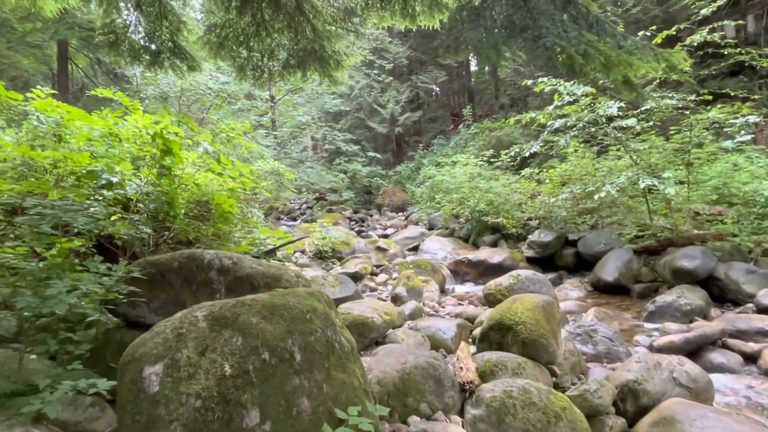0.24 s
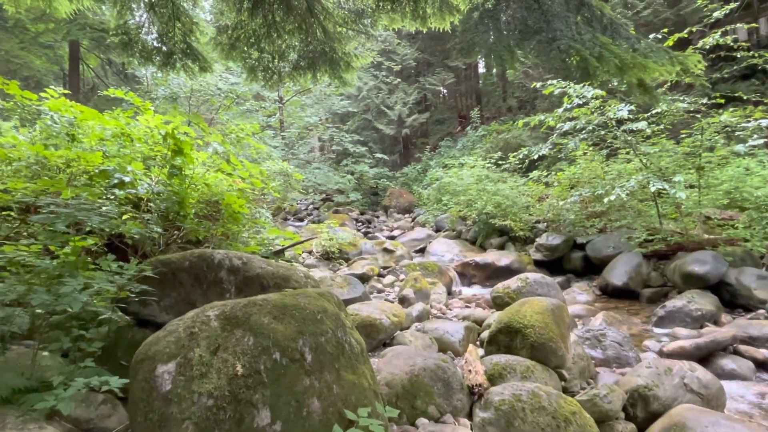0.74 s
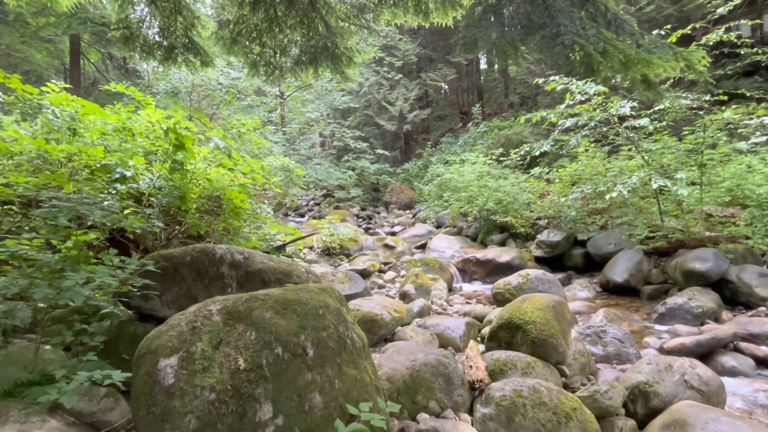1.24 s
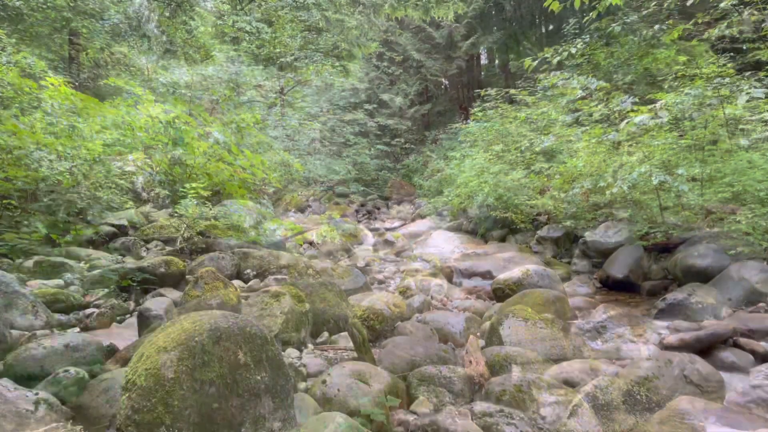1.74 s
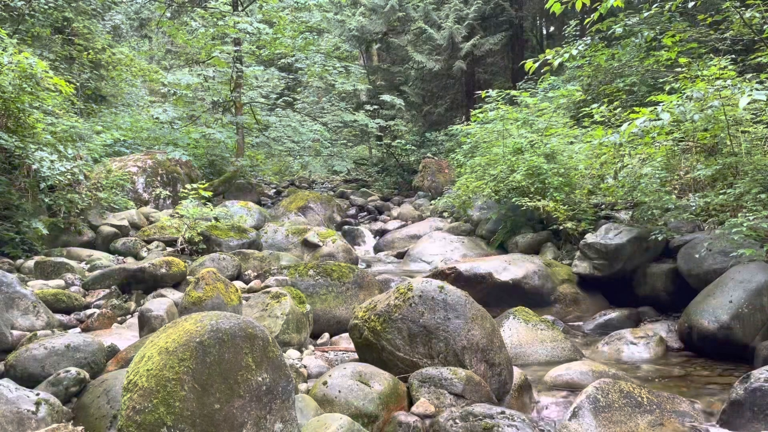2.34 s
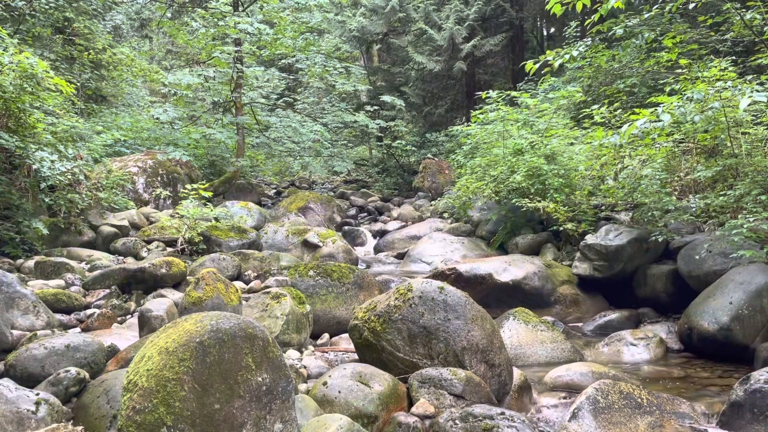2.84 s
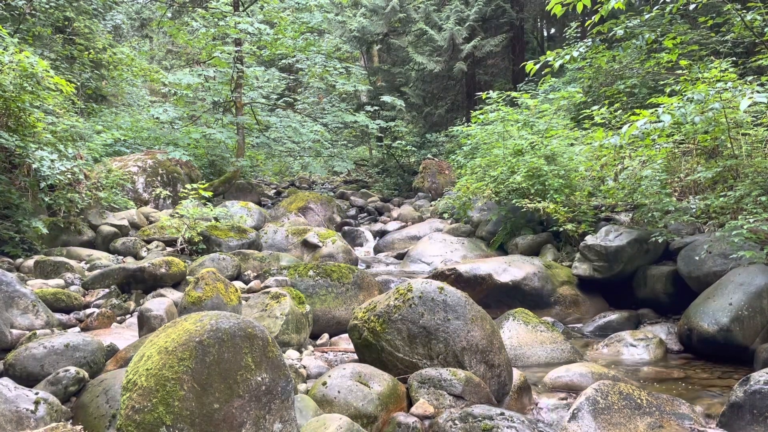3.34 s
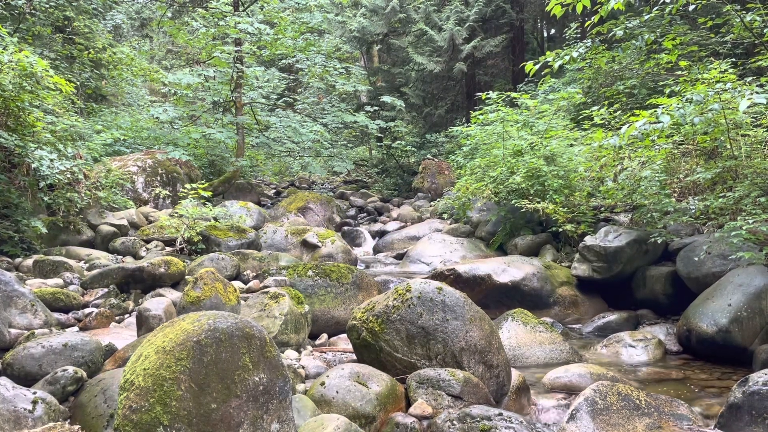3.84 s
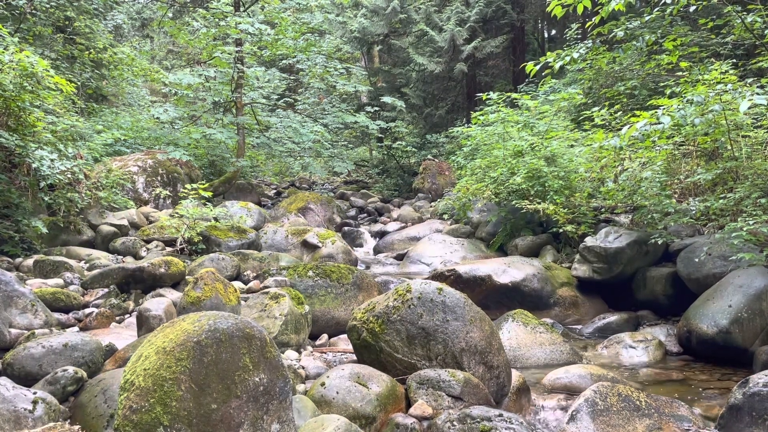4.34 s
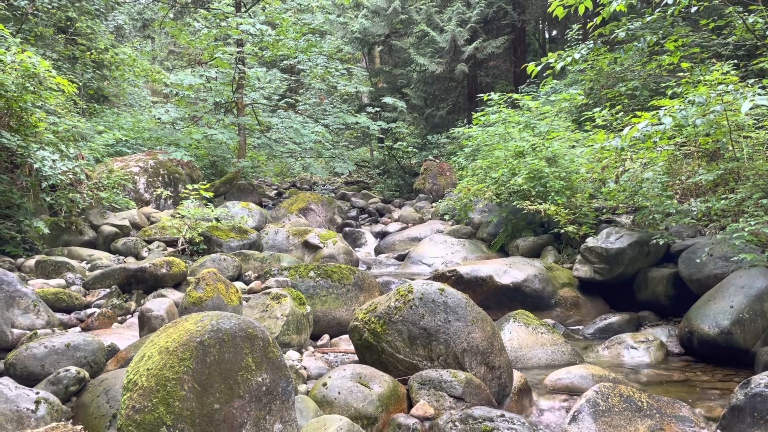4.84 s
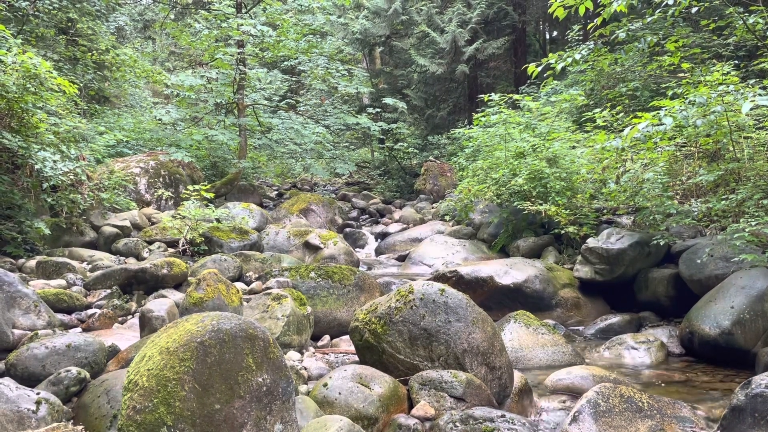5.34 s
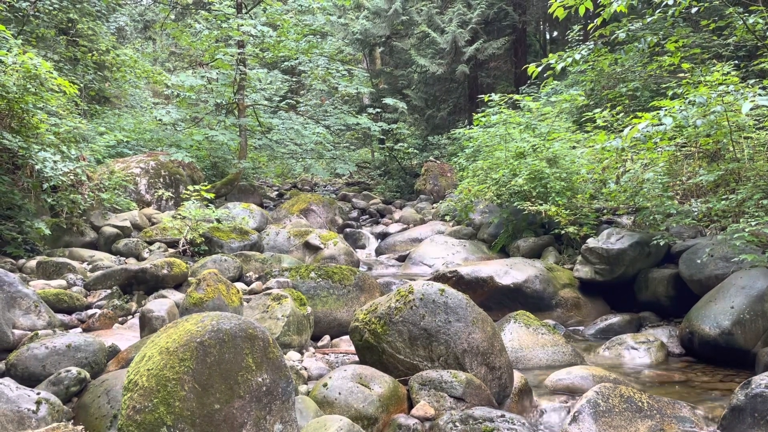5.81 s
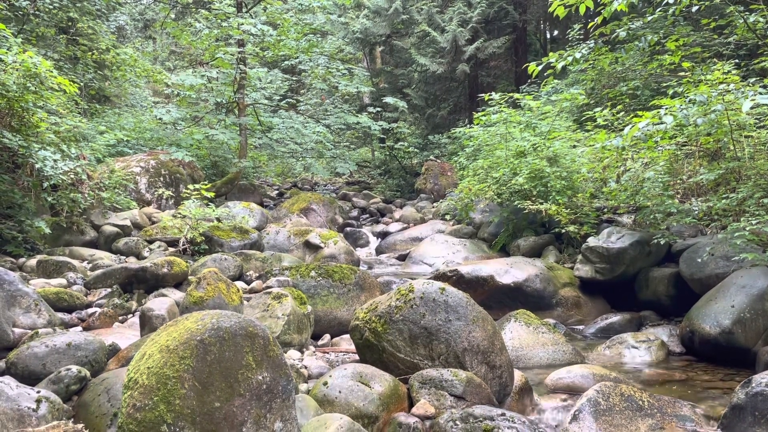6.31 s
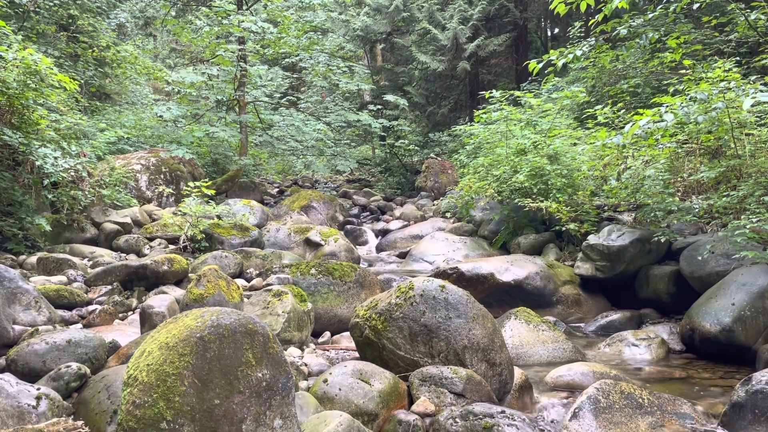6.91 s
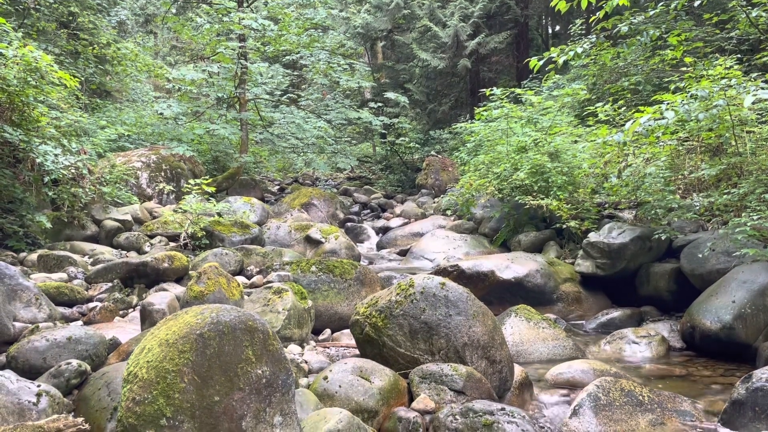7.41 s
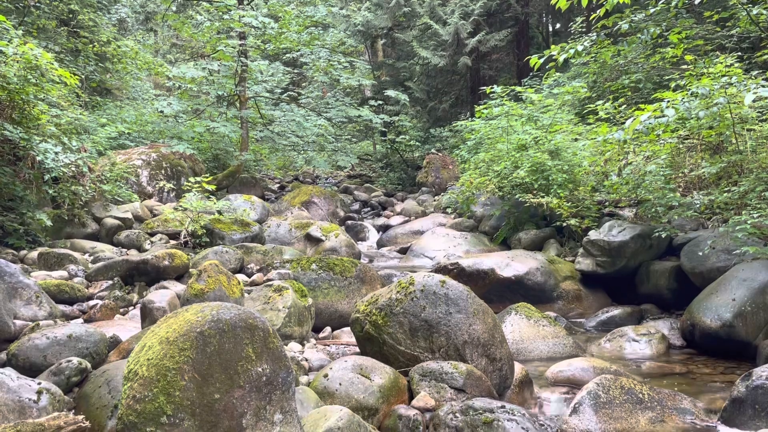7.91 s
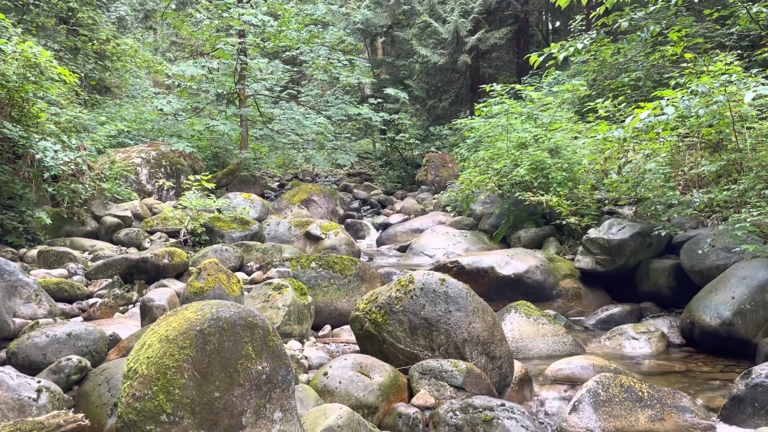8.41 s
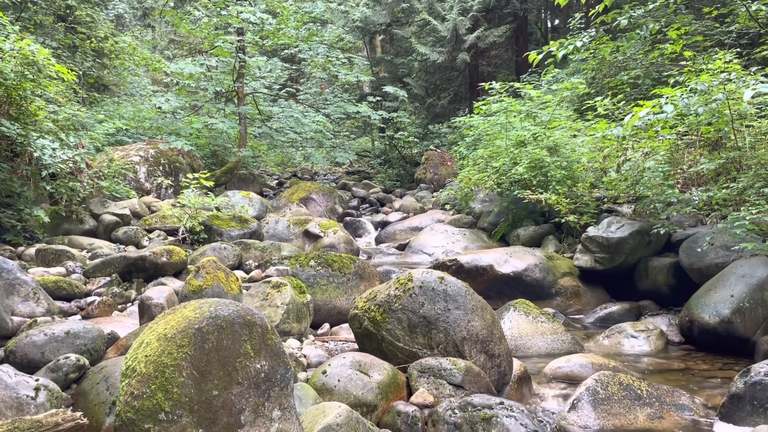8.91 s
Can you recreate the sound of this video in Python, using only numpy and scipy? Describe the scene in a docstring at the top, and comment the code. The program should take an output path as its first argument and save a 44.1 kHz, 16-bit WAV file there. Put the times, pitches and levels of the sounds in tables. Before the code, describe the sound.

A quiet creek with a faint low hum crossfades to a louder, closer small cascade, rushing steadily with gurgles, plops and little splashes.

```python
"""Forest creek between boulders

A shallow creek is heard on a phone's two microphone ports: first from a quieter spot, then, after an
equal-power cross-fade, from beside a small cascade. Noise mixed with swarms of damped sines makes the rush
of bubbles and spray; a hollow between stones hums as a wavering tone with its octave at the first spot.
Splashes are short puffs of filtered noise; larger trapped bubbles gurgle as single damped sines."""
import sys
import numpy as np
from scipy import signal
from scipy.fft import rfft, irfft, next_fast_len
from scipy.io import wavfile
from scipy.ndimage import uniform_filter1d, map_coordinates

SR = 44100
rng = np.random.default_rng(int(sys.argv[2]) if len(sys.argv) > 2 else 0)


def materialize(psi):
    """Save the field psi as 16-bit PCM at rate SR to the path in sys.argv[1].

    A 1-D psi becomes a single channel; in a 2-D psi each row is a channel.
    """
    bounded = np.clip(np.atleast_2d(psi).T, -1, 1)
    quanta = np.round(bounded * 32767).astype(np.int16)
    wavfile.write(sys.argv[1], SR, quanta)


N = 403956


def amp(db):
    """Decibel law: a level in dB becomes an amplitude ratio."""
    return 10 ** (np.asarray(db) / 20)


def unit(x):
    """Root-mean-square normalisation: the mean of the channels gets rms 1."""
    mid = np.atleast_2d(x).mean(0)
    return x / np.sqrt(np.mean(mid ** 2) + 1e-20)


def curves(rows):
    """Linear interpolation: one value per sample for each column after the time."""
    time_s, *columns = np.transpose(rows)
    return [np.interp(np.arange(N) / SR, time_s, column) for column in columns]


def wobble(rate):
    """Band-limited random fluctuation: a smooth curve of rms 1 through `rate` random knots a second."""
    knots = rng.standard_normal(int(N * rate / SR) + 4)
    return unit(map_coordinates(knots, [np.arange(N) * rate / SR]))


def filtered(x, response):
    """Linear filtering: the spectrum of x times a complex response of frequency."""
    size = next_fast_len(N + SR // 4)
    hz = np.fft.rfftfreq(size, 1 / SR)
    return irfft(rfft(x, size) * response(hz), size)[..., :N]


def above(hz, edge_hz):
    """High-pass power response: the share of power passed, one half at the edge."""
    return hz ** 4 / (hz ** 4 + edge_hz ** 4)


def ports(lead, hz):
    """Stereo phase and level difference: left and right responses, half of each on each side."""
    lead_hz, lead_rad, balance_db = np.transpose(lead)
    gain = amp(np.interp(hz, lead_hz, balance_db) / 2)
    left = gain * np.exp(.5j * np.interp(hz, lead_hz, lead_rad))
    return np.array([left, 1 / left])


PITCH_RISE = .015  # half the share of its pitch that a bubble gains per envelope time, nearing the surface


def bubbles(start, hz, gain, cycles, size):
    """Bubble resonance: damped sines that start softly, peak after `cycles` and rise a little in pitch."""
    turns = hz[:, None] * np.arange(size) / SR
    u = turns / cycles
    envelope = gain[:, None] * np.e * u * np.exp(-u)
    wave = envelope * np.sin(2 * np.pi * turns * (1 + PITCH_RISE * (u - 2)))  # passes hz at its peak
    at = np.round(start * SR).astype(int)[:, None] + np.arange(size)
    return np.bincount(at.ravel(), wave.ravel(), N + size)[:N]


def swarm(count, low_hz, high_hz, cycles, spread_db, size):
    """Superposition of many bubble resonances, some louder than the rest, into a flat spectrum of rms 1."""
    when, pitch, chance = rng.random((3, count))
    hz = low_hz * (high_hz / low_hz) ** pitch
    loud = np.minimum(-np.log(1 - chance), 3.5)
    return unit(bubbles(when * N / SR, hz, hz * amp(spread_db * loud), cycles, size=size))


def white_water():
    """Random superposition: patchy hiss with bubbles, heard directly, and patchy hiss scattered by the banks."""
    z = signal.stft(rng.standard_normal((2, N)), nperseg=256)[2]
    # one field of random patches in time and frequency shapes both streams
    patches = rng.standard_normal(z.shape[1:])
    patches = uniform_filter1d(uniform_filter1d(patches, 8, 0), 8, 1)
    patch_gain = amp(1.42 * patches / patches.std())
    direct, scattered = signal.istft(z * patch_gain, nperseg=256)[1][:, :N]
    direct += amp(-22) * swarm(count=500, low_hz=121.0, high_hz=573, cycles=1.6, spread_db=1.0, size=3000)
    direct += amp(-14.5) * swarm(count=3000, low_hz=546.7, high_hz=2518, cycles=3.52, spread_db=1.0, size=1500)
    direct += amp(-11.5) * swarm(count=4000, low_hz=2482, high_hz=12860, cycles=8.2, spread_db=2.5, size=700)
    return direct, scattered


# edges between rumble, burble, rush and spray: edge_hz
SPLITS_HZ = [240, 600, 2500]
# chance drift of each band, before the spot's share of it: rumble_db, burble_db, rush_db, spray_db
WANDER_DB = (0.51, 0.48, 0.23, 1)


def rush(spot, lead, levels_db, calm=1, rumble_db=0, burble_db=0, body_db=0):
    """Partly coherent sound field: direct and scattered water in four bands; calm is the share of drift left."""
    spot_hz, level_db, alike = np.transpose(spot)
    size = next_fast_len(N)
    hz = np.fft.rfftfreq(size, 1 / SR)
    direct, scattered = [rfft(stream, size) for stream in white_water()]
    colour_db = np.interp(np.log(hz + 1), np.log(spot_hz), level_db)
    colour = amp(colour_db) * above(hz, 26) * ports(lead, hz)
    # scattered water enters the two sides with opposite sign and so lowers their likeness
    turn = np.arccos(np.clip(np.interp(hz, spot_hz, alike), 0, 1)) / 2
    pair = colour * (np.cos(turn) * direct + np.sin(turn) * scattered * [[1], [-1]])

    shares = -np.diff([hz ** 0, *[above(hz, edge) for edge in SPLITS_HZ], 0 * hz], axis=0)
    bands = []
    for share, db, drift_db in zip(shares, levels_db, WANDER_DB):
        band = unit(irfft(pair * np.sqrt(share), size)[:, :N])
        bands.append(amp(db + calm * drift_db * wobble(4.5)) * band)
    rumble, burble, body, spray = bands

    # the spray thickens and thins in all its bands at once; the rush follows weakly
    surge_db = calm * (0.5 * wobble(9) + 1.11 * wobble(45))
    low = amp(rumble_db) * rumble + amp(burble_db) * burble
    return low + amp(body_db + 0.33 * surge_db) * body + amp(surge_db) * spray


# the quieter spot's tone colour and left-right likeness: pitch_hz, level_db, left_right_likeness (0-1)
QUIET_SPOT = [(35, -11, .92), (66, -4, 0.9), (77, -2, .92), (88, 6, .93), (104, -5, .97), (152, 0, .98),
              (205, 1, .96), (265, -4.5, .95), (328, -1, 1), (460, -8.5, 0.6), (780, -7, 0.83),
              (1380, -14.5, 0.1), (2300, -21.5, 0.15), (3640, -23.5, .5), (5300, -24, 0.3), (9900, -29, 0),
              (12100, -35, .99), (15700, -41, 1)]
# stereo image of the quieter spot: pitch_hz, left_lead_rad, left_minus_right_db
QUIET_LEAD = [(0, 0, -1.5), (520, -1.5, -1), (800, -1.6, -4.5), (1400, -1.8, 0), (2300, -3.2, 0),
              (3700, -6.7, 2.2), (5300, -9.5, 1.5), (7000, -12.3, 1), (9300, -16, -6.5), (11200, -18.8, 0),
              (12800, -18.9, 0), (14000, -21.99, 0)]
# steady levels there: rumble_db, burble_db, rush_db, spray_db
QUIET_DB = (-43.5, -48.5, -43.5, -47.5)


def quiet_stream():
    """Averaging over distance: the stream at the first, more distant spot drifts less in level."""
    return rush(QUIET_SPOT, QUIET_LEAD, QUIET_DB, calm=.4)


# the cascade's tone colour and left-right likeness: pitch_hz, level_db, left_right_likeness (0-1)
CASCADE = [(34, -15, .97), (88, 3, .99), (144, 1.5, 0.92), (367, 2.5, 0.93), (467, -3, 0.63),
           (975, -6, 0.89), (1650, -7.5, 0.66), (2630, -17, 0.09), (3480, -16.5, 0.62), (5030, -19.5, 0.53),
           (6260, -21, 0.65), (7600, -18.0, 1.0), (9200, -21.5, 1.0), (11460, -26.0, .9), (13800, -27.5, 1),
           (15500, -30, 1)]
# stereo image of the cascade: pitch_hz, left_lead_rad, left_minus_right_db
CASCADE_LEAD = [(0, 0, -.3), (400, -.4, -1.4), (1100, -.7, -2.6), (1900, -1.4, 1), (2700, -1.1, 4.5),
                (3300, .3, 3), (4800, .75, 3.7), (6900, -1.1, 1.5), (7700, -2.95, 0), (8900, -3.35, 0),
                (10400, -6.1, 0), (12300, -6.4, 0), (13900, -9.35, 0), (14500, -9.42, 0)]
# steady levels there: rumble_db, burble_db, rush_db, spray_db
CASCADE_DB = (-38.5, -43, -35.5, -39.5)
# the cascade's rumble against its steady level: time_s, rumble_db
RUMBLE = [(1.9, -5.5), (2.5, 0.5), (3.2, 3.5), (4.1, -1), (4.7, -1.5), (5.4, 2), (6.1, 2.3), (7.0, -1),
          (7.8, 2), (8.6, 1), (9.16, 1)]
# the cascade swells and sinks against its steady levels: time_s, burble_db, rush_db
SWELL = [(1.9, -1, -1.5), (2.4, 4, -0.8), (2.75, -3, 1), (3.05, -6, 0.8), (3.6, -5, 0.5), (4.05, 1, 1),
         (4.35, 8.5, 1.2), (4.9, 3.5, 0.5), (5.3, 4, -1.5), (5.8, 3.5, 1.3), (6.15, -19, 1.5),
         (6.5, -1, 1.5), (6.8, 4.5, -2), (7.05, -6, 3), (7.28, 5, 2.5), (7.38, -2, 3), (7.6, -11, 1.8),
         (8.3, -4, 1), (8.65, -1, -1), (9.16, 0, 3.5)]


def cascade_stream():
    """Amplitude modulation by band: the stream beside the cascade swells and sinks along set curves."""
    return rush(CASCADE, CASCADE_LEAD, CASCADE_DB, 0.72, *curves(RUMBLE), *curves(SWELL))


# a hollow between stones sings as it fills and empties: time_s, pitch_hz, level_db
HUM = [(0.0, 173.3, -47), (0.2, 166.7, -46), (0.33, 159, -40), (0.4, 139.5, -45), (0.5, 159.8, -51),
       (0.8, 148, -50), (0.9, 157.5, -43.5), (1.1, 149, -43.5), (1.19, 166, -46), (1.27, 149.6, -43),
       (1.45, 151.7, -43), (1.55, 160, -52), (1.7, 156, -58)]
OVERTONE_DB = -10.5  # the octave against the note, before both flutter


def hum():
    """Cavity resonance: water passing a hollow sings one low note and a faint octave, fluttering in level."""
    hz, db = curves(HUM)
    phase = 2 * np.pi * np.cumsum(hz + 4 * wobble(12)) / SR  # pitch wavers by 4 Hz rms
    note = amp(1.5 * wobble(17.47)) * np.sin(phase)
    octave = amp(OVERTONE_DB + 4.3 * wobble(9.7)) * np.sin(2 * phase)
    return np.sqrt(2) * amp(db) * (note + octave)


# cross-fade between the spots: time_s, second_spot_share (0-1)
FADE = [(1.45, 0.03), (1.75, .3), (2.0, .7), (2.2, 1)]


def at_cascade(share):
    """Uniform placement: a share 0-1 becomes a moment while the cascade sounds alone."""
    fade_end_s = FADE[-1][0]
    return fade_end_s + (N / SR - fade_end_s) * share


# chance bursts at the cascade: peak, top band against it, scatter either way
SPIT_DB, SPIT_TOP_DB, SPIT_SPREAD_DB = -29.5, -12, 5
# the loudest bursts of spray: peak_s, level_db, top_band_against_whole_db
SPLASHES = [(0.974, -41, 10.5), (1.944, -36, -5.6), (2.134, -28, -5), (2.662, -26, -15.6), (2.724, -26, -9),
            (3.008, -24.5, -4), (3.331, -24, -10), (3.742, -22, -17), (3.976, -27, -10), (5.236, -34, 9),
            (5.449, -35, 6), (5.61, -26, -13), (5.786, -25.5, -4), (6.146, -31, 3), (6.314, -32, 5),
            (6.475, -25, -9), (6.645, -24, -7), (7.666, -23, -5), (7.724, -22.5, -5), (7.988, -24.5, -8),
            (9.134, -22, -10)]


def noise_band(low_hz, high_hz):
    """Band-pass filtering: white noise kept between two smooth edges, at rms 1."""
    noise = rng.standard_normal(N)
    return unit(filtered(noise, lambda hz: above(hz, low_hz) * (1 - above(hz, high_hz))))


def splashes(count=18):
    """Impulsive noise: each splash is a puff a few milliseconds long, some brighter than others."""
    t = np.arange(N) / SR
    whole, top = np.zeros(N), np.zeros(N)
    when, loud, bright = rng.random((count, 3)).T
    spit_db = SPIT_DB + SPIT_SPREAD_DB * (2 * loud - 1)
    spit_top_db = SPIT_TOP_DB + SPIT_SPREAD_DB * (2 * bright - 1)
    for s, db, top_db in [*SPLASHES, *zip(at_cascade(when), spit_db, spit_top_db)]:
        near = slice(max(round(s * SR) - 400, 0), round(s * SR) + 1200)
        u = t[near] - s
        puff = np.where(u < 0, np.exp(-(u / 0.0017) ** 2), np.exp(-u / 0.0035))
        whole[near] += amp(db) * puff
        top[near] += amp(db + top_db) * puff
    spray = whole * noise_band(2900, 7900) + top * noise_band(7800, 10000)
    return spray / 2  # peaks of the noise reach twice its rms


# cycles to the peak at 1 kHz; power of pitch by which small bubbles ring for more cycles
CYCLES_AT_1K, CYCLES_GROW = 1.5, 0.36
# chance bubbles at the cascade: peak at 300 Hz, scatter either way; loss per octave up, torn ones too
STRAY_DB, STRAY_SPREAD_DB, FALL_DB = -34, 6, 1
# smaller bubbles torn off a loud one: greatest delay, level against it, greatest rise in pitch
CLOUD_S, CLOUD_DB, CLOUD_OCTAVES = .02, -10, 0.72
# single low and high gurgles, and one short swell of the hum at 0.375 s:
# start_s, level_db, pitch_hz, cycles_to_peak
GURGLES = [(0.218, -23.5, 970, 1.4), (0.229, -30, 250, 0.98), (0.25, -35, 206, 4.5), (0.28, -27, 744, 2.6),
           (0.375, -35, 130, 1.8), (0.45, -27.5, 365, 1.3), (0.82, -29, 950, 2), (0.561, -21, 796, 1.8),
           (0.6, -25, 900, 1.8), (0.612, -30, 885, 4), (0.68, -35.5, 325, 4), (0.721, -27, 760, 1.3),
           (0.737, -31, 530.0, 1.9), (1.03, -29, 1586, 1.6), (1.5, -35, 160.5, 2), (1.615, -32, 298, 2.5),
           (1.949, -16, 965, 0.45), (1.951, -30, 1890, 2.3), (1.952, -28.5, 167.0, 1.4),
           (1.989, -35.0, 2830.0, 4.4), (2.067, -23.5, 316, 1.4), (2.07, -32, 119, 1.4),
           (2.155, -27, 1890.0, 2.5), (2.182, -23.0, 143, 0.59), (2.191, -25, 400.0, 1.4),
           (2.205, -24, 324, 2), (2.216, -25, 440.0, 1.1), (2.226, -20.0, 1500.0, 1.1),
           (2.262, -24, 1230, 1.5), (2.368, -24.0, 1135, 2.6), (2.372, -17, 295, 0.66),
           (2.374, -24, 155, 1.7), (2.388, -26, 670.0, 0.8), (2.452, -25, 1130, 3.3),
           (2.477, -21, 500.0, 0.52), (2.683, -19, 840, 0.83), (2.687, -23.5, 166, 0.86),
           (2.705, -23, 251, 1.1), (2.723, -13, 308, 0.43), (2.735, -26, 380, 1.1),
           (2.883, -25, 2380.0, 1.6), (2.945, -24, 520, 1.8), (3.153, -27, 145, 1.8),
           (3.269, -28.0, 930, 3.5), (3.322, -26.5, 168, 1.7), (3.329, -22, 640, 0.89),
           (3.333, -22, 396, 0.7), (3.359, -29, 530.0, 0.64), (3.454, -26.0, 4490.0, 2.2),
           (3.568, -25, 1080, 1.3), (3.607, -16, 1580, 0.79), (3.61, -23.5, 670.0, 1.3),
           (3.614, -27, 210.0, 0.84), (3.725, -25, 1780.0, 3.8), (3.736, -20.0, 1490, 1.6),
           (3.737, -19, 352, 0.7), (3.976, -25, 139, 2), (4.013, -24.0, 535, 1.1), (4.322, -19, 285, 1.1),
           (4.344, -24, 4230.0, 2.2), (4.363, -20.5, 1230, 2.2), (4.377, -24, 533, 1.1),
           (4.424, -21, 427, 1.5), (4.482, -25, 560.0, 1.1), (4.512, -21, 290, 1.2), (4.523, -25, 370, 1.2),
           (4.574, -26, 340, 1.1), (4.631, -22, 292, 1.3), (4.682, -23, 340, 0.78), (4.704, -22, 142, 0.64),
           (4.711, -28, 2650, 4.3), (4.84, -19, 550, 0.37), (4.874, -19.5, 382, 0.92),
           (4.93, -22, 377, 1.1), (5.057, -24, 320, 1), (5.104, -17.5, 397, 1.3), (5.132, -25, 660, 3.5),
           (5.239, -31, 338, 1.3), (5.254, -17.5, 1330.0, 0.85), (5.274, -19, 312, 1),
           (5.322, -21, 220, 0.99), (5.323, -20.5, 890, 2.8), (5.387, -19, 347, 1), (5.459, -24, 1340, 2.9),
           (5.53, -29, 132.0, 1.8), (5.544, -29, 125.0, 1.0), (5.578, -15.5, 427, 1.1),
           (5.598, -22, 840.0, 1.1), (5.608, -29, 4040, 4.9), (5.609, -22.5, 278, 2.4),
           (5.627, -23, 330, 1.1), (5.68, -25, 640, 2.5), (5.715, -26.5, 170, 1), (5.722, -24, 533, 0.96),
           (5.764, -20, 382, 1.2), (5.782, -19, 285, 0.97), (5.789, -20, 474, 0.83),
           (5.8, -20.5, 1010, 2.9), (5.823, -28, 990, 3.9), (5.88, -22, 390, 1.5),
           (5.954, -28, 3170.0, 2.0), (5.996, -20, 204, 0.6), (6.145, -21, 1190.0, 1.9),
           (6.272, -25, 1210, 2.1), (6.404, -28.0, 665, 3.1), (6.418, -27, 4490.0, 2.2),
           (6.44, -29, 2180, 4.1), (6.65, -26.0, 1350, 3.4), (6.839, -29, 141, 1.3),
           (6.977, -20, 280.0, 1.2), (7.013, -23, 247, 1.5), (7.065, -27, 610, 3.3),
           (7.069, -22, 1010, 1.6), (7.094, -21.5, 392, 1.3), (7.1, -18, 1680.0, 1.2), (7.25, -25, 627, 3),
           (7.27, -18.5, 504, 1.1), (7.272, -23, 740, 2), (7.286, -22, 320, 1.4), (7.287, -20, 1730, 1.3),
           (7.314, -22.5, 350.0, 1.4), (7.398, -24, 1260.0, 2.2), (7.417, -27, 169, 1.8),
           (7.435, -24, 2520.0, 1.4), (7.645, -18.0, 360, 0.84), (7.651, -21.5, 1350, 2.7),
           (7.9, -31, 4490.0, 5.1), (7.915, -27, 148, 2.1), (7.966, -15.5, 474, 0.27),
           (7.967, -22.5, 3170.0, 1.5), (8.011, -23.5, 262, 1.8), (8.079, -27, 156, 1.4),
           (8.102, -24, 1470, 4.5), (8.103, -26, 1780, 4), (8.21, -28, 1550, 6), (8.156, -21, 670.0, 0.88),
           (8.244, -25, 284, 1.8), (8.335, -19, 238, 0.46), (8.366, -24.0, 1780.0, 2.4),
           (8.371, -26, 700, 1.2), (8.372, -24, 4200, 3.2), (8.441, -21, 390, 0.93),
           (8.524, -21.5, 900, 1.3), (8.625, -22, 1170, 2), (8.837, -20, 600, 0.91), (8.862, -22.5, 393, 2),
           (8.862, -22.5, 1950, 4.6), (8.866, -25, 1320, 4.7), (8.982, -25, 880, 2.6),
           (8.994, -29, 1040, 2.7), (9.057, -22.5, 374, 1.5), (9.089, -17.5, 460, 1.2),
           (9.119, -22, 295, 0.42), (9.15, -24.0, 1590.0, 2.4)]


def ring_cycles(hz):
    """Damping law: cycles to the peak grow as a power of pitch."""
    return CYCLES_AT_1K * (hz / 1000) ** CYCLES_GROW


def gurgles(count=40, count_torn=1):
    """Bubble resonance: air trapped under stones rings and sheds smaller bubbles; weaker ones come by chance."""
    when, pitch, loud = rng.random((count, 3)).T
    octaves = 3.2 * pitch
    hz = 300 * 2 ** octaves
    stray_db = STRAY_DB + STRAY_SPREAD_DB * (2 * loud - 1) - FALL_DB * octaves
    stray = [at_cascade(when), stray_db, hz, ring_cycles(hz)]

    s, db, hz, _ = np.repeat(GURGLES, count_torn, axis=0).T
    late, higher = rng.random((len(s), 2)).T
    octaves = CLOUD_OCTAVES * higher
    hz = hz * 2 ** octaves
    cloud_s = np.clip(s + CLOUD_S * late, 0, N / SR)
    cloud = [cloud_s, db + CLOUD_DB - FALL_DB * octaves, hz, ring_cycles(hz)]

    s, db, hz, cycles = np.hstack([np.transpose(GURGLES), stray, cloud])
    return bubbles(s, hz, amp(db), cycles[:, None], size=4096)


def scene():
    """Equal-power cross-fade: the first spot's stream and hum fade out as the cascade fades in."""
    angle = np.clip(curves(FADE)[0], 0, 1) * np.pi / 2
    fade_out, fade_in = np.cos(angle), np.sin(angle)
    close = gurgles() + splashes()
    second = np.arange(N) > 1.7 * SR  # from 1.7 s on, single sounds come from the cascade
    first_close = close * ~second + fade_out * hum()
    first_spot = fade_out * quiet_stream() + filtered(first_close, lambda hz: ports(QUIET_LEAD, hz))
    cascade_close = filtered(close * second, lambda hz: ports(CASCADE_LEAD, hz))
    return first_spot + fade_in * cascade_stream() + cascade_close


TOP_HZ = 15750  # band limit


def record(dry):
    """Microphone resonance: the response lifts by up to 5 dB at the top; nothing is kept above the band limit."""
    def response(hz):
        lift_db = 5 * np.clip((hz - 14000) / 1600, 0, 1)
        return amp(lift_db) * (hz < TOP_HZ)
    return filtered(dry, response)


dry = scene()
out = record(dry)
materialize(out)
```